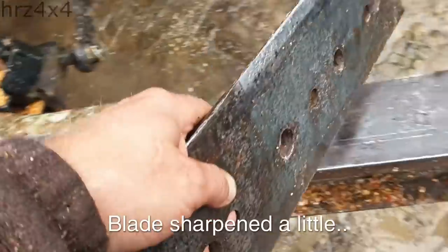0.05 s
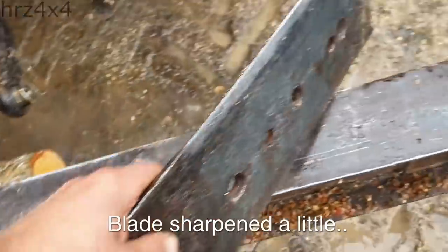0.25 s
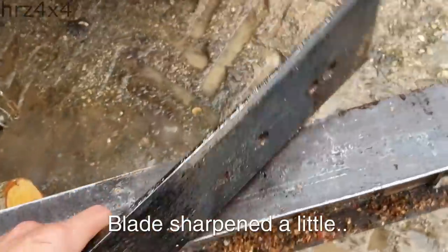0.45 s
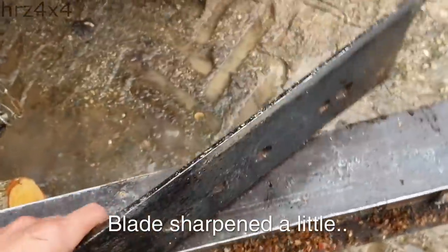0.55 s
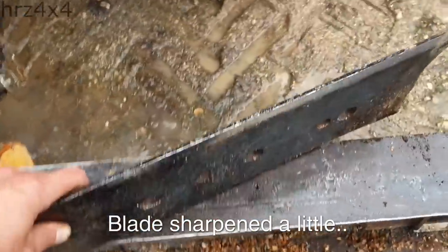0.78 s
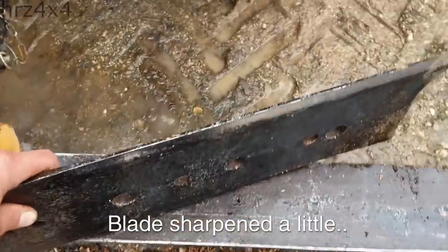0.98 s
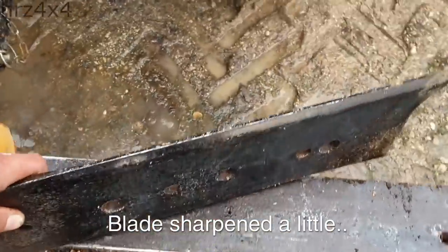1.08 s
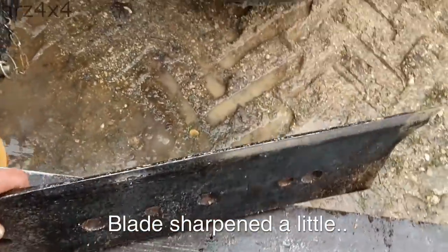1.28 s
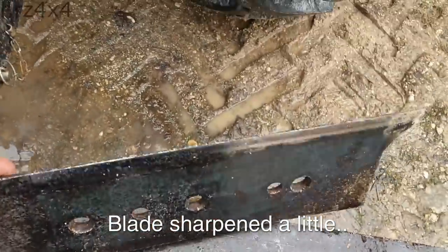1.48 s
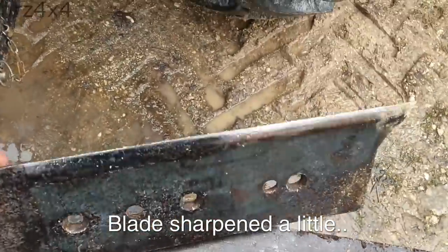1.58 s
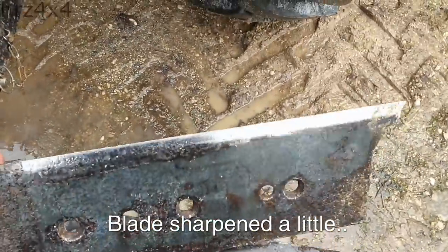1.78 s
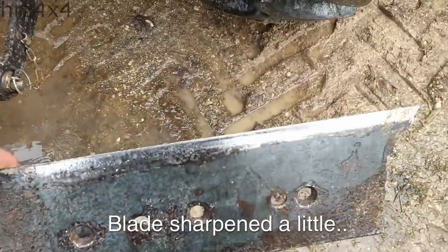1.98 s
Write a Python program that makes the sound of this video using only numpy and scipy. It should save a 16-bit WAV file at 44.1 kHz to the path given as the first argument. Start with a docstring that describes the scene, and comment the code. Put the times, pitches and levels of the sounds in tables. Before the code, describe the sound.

A steel blade clanks and rings against a steel beam, then wind buffets the microphone.

```python
"""Steel blade clanking on a beam

A heavy steel blade is laid over on a steel beam outdoors. It lands, bounces and chatters in two
bouts of clanks. Each knock makes blade and beam ring together, until the hand damps them. Then
the blade is tilted with a few light ticks while gusts buffet the microphone, over a faint hiss."""
import sys
import numpy as np
from scipy import signal
from scipy.fft import irfft
from scipy.io import wavfile

SR = 44100
rng = np.random.default_rng(int(sys.argv[2]) if len(sys.argv) > 2 else 0)


def wrap_up_sound(samples):
    """Save the sound to the file named by the first command line argument, as 16-bit audio."""
    columns = np.atleast_2d(samples).T
    # keep every value between -1 and 1, then stretch to whole-number steps
    tamed = np.clip(columns, -1, 1)
    steps = np.round(tamed * 32767).astype(np.int16)
    wavfile.write(sys.argv[1], SR, steps)


N = 90404
TIME = np.arange(N) / SR
RING_SIZE = SR // 2
RING_TIME = TIME[:RING_SIZE]
EDGES_HZ = np.geomspace(20, 17000, 35)
BANDS_HZ = np.sqrt(EDGES_HZ[1:] * EDGES_HZ[:-1])

# Levels in the tables are relative. A fade time (T60) is how long a sound takes to drop by 60 dB.
# Where the strength of a knock is given: (frequency [Hz])
KNOCK_HZ = [220, 520, 1500, 4000, 11000]
# Steel meets steel: (time [s], chatter length [s], then a level [dB] for each of KNOCK_HZ)
KNOCKS = [ (0.1999, 0.0028, -25, -17.5, -23.5, -23, -39.5), (0.2135, 0.0061, -37, -18.5, -31, -33.5, -38),
          (0.2406, 0.0049, -42, -26, -34.5, -23, -28), (0.3066, 0.0047, -38.5, -39, -42, -31.5, -34),
          (0.377, 0.015, -45.5, -35, -39.5, -32, -36.5), (0.4003, 0.00058, -41, -35, -33.5, -28.5, -31),
          (0.6081, 0.014, -54, -51, -33.5, -32.5, -31.5), (0.6208, 0.0086, -27, -21.5, -25, -26, -27.5),
          (0.6524, 0.0052, -25.5, -39, -27.5, -36.5, -34.5), (0.658, 0.0042, -38.5, -25, -30, -16, -24),
          (0.6790, 0.042, -33, -28.5, -28.5, -34, -34.5), (0.732, 0.0018, -31, -57, -37, -31.5, -34.5),
          (0.7818, 0.0031, -41.5, -44.5, -48.5, -35, -37.5), (0.805, 0.013, -69.5, -42, -53, -43.5, -42),
          (0.841, 0.0013, -43.5, -40, -47, -56, -66), (1.0749, 0.001, -72, -62, -72, -69, -63),
          (1.229, 0.00093, -70, -77, -73, -65.5, -67.5), (1.3991, 0.0087, -62, -44.5, -52.5, -58, -56),
          (1.626, 0.0072, -66, -74, -77, -54.5, -51), (1.6728, 0.0036, -81.5, -72, -54.5, -48, -43)]
CHATTER_PER_S, CHATTER_SIZE = 1500, .5
# Modes, the tones at which blade and beam naturally ring: (pitch [Hz])
MODE_HZ = [174, 238, 272, 414, 437, 597, 657, 790, 853, 914, 964, 1255, 1418, 1577, 1640, 1700, 1782, 2015,
           2675, 3053, 3166, 3495, 3793, 3848, 3936, 4477, 4590, 8270, 9835, 11142]
# For each of those modes: (level with blade on edge [dB], level with blade flat [dB], fade time [s])
MODES = [(-30, -16, 0.66), (-8, -8, 0.28), (-16, -15.5, 0.42), (-5, -11, 0.25), (-6, -21, 0.34),
         (-3, -9, 0.083), (-18, -8, 0.19), (-15.5, -19, 0.43), (-20.5, -30.5, 0.18), (-8, -36.5, 0.2),
         (-13.5, -14.5, 0.46), (-2.5, -19, 0.096), (-17.5, -19.5, 0.17), (-15.5, -29, 0.21),
         (-19, -20.5, 0.097), (-5.5, -5, 0.173), (-7.5, -12.5, 0.22), (-7, -8, 0.28), (-12.5, -20, 0.16),
         (-20, -10, 0.23), (-10.5, -11, 0.1), (-20, -19, .26), (-9.5, -8, 0.17), (-8, -16, 0.2),
         (-20, -12, 0.12), (-19, -36.5, 0.21), (-17, -21, .1), (-15, -7.5, 0.0417), (-33, -6.5, 0.027),
         (-24, -19, .13)]
LAID_FLAT_S, RISE_CYCLES = .55, 1
GRIPS_S, GRIP_DB_PER_S = [0.51, 0.834], 172.5  # the hand tightens
# The crowd of weaker modes in between: (frequency [Hz], level [dB], fade time [s])
CROWD = [(89.3, -8.5, 0.34), (153, -15.5, 0.4), (241.4, -4.5, 0.32), (510, -7, 0.29), (660, -3, 0.2),
         (1010, -10, 0.42), (1944, -4, 0.21), (2860, -16.5, 0.19), (3820, -6, 0.16), (4650, -15, 0.13),
         (7800, -25, 0.23), (8540, -17, 0.14), (13100, -15, 0.12), (15800, -22.5, 0.21)]
CROWD_DB, CROWD_GAP_HZ, CROWD_SPREAD_DB = -28.5, 14, 3.2  # the gap holds at 1 kHz and widens above
CLACK_DB, CLACK_T60_S = 1, 0.01
# How wide the steel sounds: (frequency [Hz], side minus mid [dB])
STEEL_WIDTH = [(100, -14), (200, -29), (380, -7.5), (700, -5.5), (1290, 2), (2400, 0.5), (15000, -1.5)]
# Which way it leans: (frequency [Hz], left minus right [dB])
STEEL_PAN = [(200, 0), (700, -.5), (1300, 0.5), (2400, -3), (4400, -3.5), (9000, -0.5)]
TICK_DB, TICK_T60_S, TICK_HZ = 12.5, 0.0045, 7000
# The blade's weight lands: (time [s], level [dB], pitch [Hz])
THUDS = [(0.2011, 0.5, 486), (.2118, 0, 609)]
THUD_T60_S, THUD_RISE_S, THUD_SKEW_RAD = 0.023, 0.0022, 0.26  # skew puts left and right out of step
# Light touches of the tilted blade: (time [s], level [dB])
PINGS = [(1.399, -53.5), (1.623, -55), (1.674, -49)]
PING_HZ, PING_T60_S = 4224, .25
# The blade slides as it tilts: (time [s], level [dB])
SLIDE_LEVEL = [(1.385, -99), (1.40, -66.5), (1.46, -62.5), (1.54, -67.5), (1.59, -65), (1.65, -60),
               (1.72, -66.5), (1.8, -67), (1.92, -68.5), (2.05, -81)]
# The tone of that rub: (frequency [Hz], level [dB])
SLIDE_SPECTRUM = [(1000, -30), (2500, -12.5), (4200, 7), (6500, -1.5), (9000, 2.5), (11500, 3), (16000, -8)]
GRIT_DB, GRIT_HZ = 2.5, 110

# Wind on the microphone: (time [s], rumble [dB], flutter [dB], left minus right [dB])
GUSTS = [(0, -67, -69, -28), (.13, -49.5, -66, -1), (.27, -60, -77, -18), (.55, -78, -79.5, -4),
         (1.02, -54, -67.5, -0.5), (1.08, -42, -58.5, -7.5), (1.17, -56.5, -68, 2), (1.24, -39, -58, 0),
         (1.37, -31, -39, -2), (1.405, -32, -23.5, 1.5), (1.44, -33, -36.5, -2), (1.545, -34, -48, -1),
         (1.575, -32, -38.5, -2.5), (1.63, -31.5, -33, -4.5), (1.69, -33, -51.5, -1.5),
         (1.76, -36.5, -40.5, -2), (1.785, -37, -38.5, 0.5), (1.89, -35, -44, -2),
         (1.955, -45, -51.5, -2.5), (2.02, -29, -44, -3), (2.05, -45, -54, -6.5)]
# The wind's deep rumble: (frequency [Hz], level [dB])
RUMBLE_SPECTRUM = [(20, -25.5), (45, 5.5), (90, -0.5), (150, -6), (250, -22), (500, -42.5), (1000, -76)]
# Its higher flutter: (frequency [Hz], level [dB])
FLUTTER_SPECTRUM = [(60, -6), (150, -5.5), (280, 2), (450, -5), (700, -17.5), (1300, -27), (2500, -52),
                    (6000, -65), (16000, -78)]
RUMBLE_DB, FLUTTER_DB, LUMPS_DB, LUMPS_HZ = -0.5, 3, 2.5, 45
# Eddies, single swirls of air: (time [s], level [dB], pitch [Hz], left minus right [dB])
EDDIES = [(1.081, -36, 71, -2), (1.395, -19, 234, 5), (1.419, -14, 250, -8), (1.45, -25, 98, -13),
          (1.576, -16.5, 94.6, -1.5), (1.624, -29, 300, -4), (1.806, -23, 110, -20),
          (1.847, -20.5, 79.4, -14), (1.886, -20, 103, 2)]
EDDY_HALF_CYCLES, EDDY_SKEW_RAD = 0.76, 0.71
# The tone of the outdoor hiss: (frequency [Hz], level [dB])
AIR_SPECTRUM = [(30, -7.5), (250, -4), (450, 2.5), (800, 1), (1300, -5.5), (1750, -3.5), (2100, -1),
                (2500, -14), (3100, -12), (6000, -24), (11000, -22), (16000, -29.5)]
# How loud that hiss is: (time [s], level [dB])
AIR_LEVEL = [(0, -51.5), (.17, -49), (.55, -57), (.9, -54.5), (1.15, -57.5), (1.7, -59.5), (2.05, -60)]
LOW_CUT_HZ, HIGH_CUT_HZ = 34, 15900


def clear_modes():
    """Each knock adds energy to every mode of the steel; once the blade lies flat, other modes lead."""
    hz = np.array(MODE_HZ)
    edge_db, flat_db, t60 = np.transpose(MODES)
    skew = np.arctan(from_db(at_hz(STEEL_WIDTH, hz)[0]))
    stereo = panned(at_hz(STEEL_PAN, hz)[0]) * np.exp(1j * np.array([-skew, skew]))
    rings = np.sqrt(2) * np.exp(2j * np.pi * np.outer(hz, RING_TIME)) * dying(t60) * rising(hz)
    out, last_s = np.zeros((2, N + SR)), 0
    swing = 1e-12 * np.exp(2j * np.pi * rng.random(len(hz)))
    for s, _, *knock_db in KNOCKS:
        swing = swing * np.exp((2j * np.pi * hz - np.log(1000) / t60) * (s - last_s))
        size = knock_strength(hz, knock_db) * from_db(edge_db if s < LAID_FLAT_S else flat_db)
        # A kick a quarter cycle off the swing already there never cancels it.
        kick = size * rng.choice([-1j, 1j], len(hz)) * np.exp(1j * np.angle(swing))
        add_ring(out, s, ((stereo * kick) @ rings).real)
        swing, last_s = swing + kick, s
    return out[:, :N]


def crowded_modes():
    """Modes too close to tell apart clack and ring, in a new mixture for each point of contact."""
    db, t60 = at_hz(CROWD, BANDS_HZ)
    mid, side = split_bands(crowd_tones(size=2 * SR)).transpose(1, 0, 2)
    width = from_db(at_hz(STEEL_WIDTH, BANDS_HZ)[0])[:, None]
    tones = np.array([mid + width * side, mid - width * side]) / np.sqrt(1 + width ** 2)
    envelope = (dying(t60) + from_db(CLACK_DB) * dying(CLACK_T60_S)) * rising(BANDS_HZ)
    stereo = np.sqrt(SR / 2) * from_db(db + CROWD_DB) * panned(at_hz(STEEL_PAN, BANDS_HZ)[0])
    out = np.zeros((2, N + SR))
    for s, chatter_s, *knock_db in KNOCKS:
        start = rng.integers(SR)
        gains = stereo * knock_strength(BANDS_HZ, knock_db)
        ring = np.einsum("cb,cbt,bt->ct", gains, tones[:, :, start:start + RING_SIZE], envelope)
        clank = signal.fftconvolve(ring, chatter(chatter_s)[None], axes=1)
        add_ring(out, s, clank[:, :RING_SIZE])
    return out[:, :N]


def crowd_tones(size):
    """Hundreds of steady tones, unevenly spaced and unequal in strength."""
    step = CROWD_GAP_HZ / (2 * np.sqrt(1000))
    roots = np.arange(np.sqrt(EDGES_HZ[0]), np.sqrt(EDGES_HZ[-1]), step)
    hz = (roots + step * rng.random(len(roots))) ** 2
    strength = np.sqrt(roots) * from_db(CROWD_SPREAD_DB * rng.standard_normal(len(hz)))
    lines = np.zeros((2, 2, size // 2 + 1), complex)
    lines[..., (hz * size / SR).astype(int)] = strength * np.exp(2j * np.pi * rng.random((2, 2, len(hz))))
    return rms_one(irfft(lines, size))


def chatter(length_s):
    """The force of one knock: a blow, then tiny bounces that die away."""
    t = TIME[:SR // 10]
    sizes = CHATTER_SIZE * rng.standard_normal(len(t))
    touching = rng.random(len(t)) < CHATTER_PER_S / SR
    force = sizes * touching * np.exp(-t / length_s)
    force[0] = 1
    return force / np.linalg.norm(force)


def knock_strength(hz, knock_db):
    """How strongly one knock drives each frequency."""
    return from_db(np.interp(np.log(hz), np.log(KNOCK_HZ), knock_db))


def rising(hz):
    """A ring builds up briefly as it spreads through the steel."""
    return 1 - np.exp(-np.outer(hz, RING_TIME) / RISE_CYCLES)


def add_ring(out, s, ring):
    """Start a ring at s seconds; the hand's next grip, if there is one, chokes it."""
    grip_s = min([g for g in GRIPS_S if g > s], default=np.inf)
    held_s = np.maximum(s + RING_TIME - grip_s, 0)
    start = int(s * SR)
    out[:, start:start + RING_SIZE] += ring * from_db(-GRIP_DB_PER_S * held_s)


def ticks():
    """Edge meets edge with a brief bright tick; the longer the chatter, the weaker it is."""
    out = np.zeros((2, N + SR))
    bright = signal.butter(2, TICK_HZ, "high", fs=SR, output="sos")
    for s, chatter_s, *knock_db in KNOCKS:
        burst = rng.standard_normal((2, RING_SIZE)) * dying(TICK_T60_S)
        gain = from_db(TICK_DB + knock_db[-1]) / (1 + (chatter_s / TICK_T60_S) ** 2)
        add_ring(out, s, gain * signal.sosfilt(bright, burst + 1e-18))
    return out[:, :N]


def thuds():
    """The first landing shoves the beam into a few low swings that die quickly."""
    out, skew = np.zeros((2, N)), THUD_SKEW_RAD * np.array([[-1], [1]])
    for s, db, hz in THUDS:
        t = np.maximum(TIME - s, 0)
        envelope = from_db(db - 60 * t / THUD_T60_S) * (1 - np.exp(-t / THUD_RISE_S))
        out += envelope * np.sin(2 * np.pi * hz * t + skew)
    return out


def pings():
    """Each light touch sets one high mode of the blade singing."""
    out = np.zeros((2, N + SR))
    for s, db in PINGS:
        tone = np.sin(2 * np.pi * (PING_HZ * RING_TIME + rng.random((2, 1))))
        add_ring(out, s, from_db(db) * dying(PING_T60_S) * tone)
    return out[:, :N]


def slide():
    """Steel rubs on steel with a faint, gritty hiss."""
    rub = from_db(in_time(SLIDE_LEVEL)[0]) * shaped_noise(SLIDE_SPECTRUM)
    grit = rms_one(from_db(GRIT_DB * drift(GRIT_HZ)[0]))
    return rub * grit


def wind():
    """Churning air rumbles on the microphone; strong gusts add a higher, lumpy flutter."""
    rumble_db, flutter_db, pan_db = in_time(GUSTS)
    lumps = rms_one(from_db(LUMPS_DB * drift(LUMPS_HZ)))
    rumble = from_db(rumble_db + RUMBLE_DB) * shaped_noise(RUMBLE_SPECTRUM)
    flutter = from_db(flutter_db + FLUTTER_DB) * shaped_noise(FLUTTER_SPECTRUM) * lumps
    return (rumble + flutter) * panned(pan_db)


def eddies():
    """Each eddy hits the microphone as a soft swell of one or two pressure swings."""
    out = np.zeros((2, N))
    for s, db, hz, pan_db in EDDIES:
        cycles = (TIME - s) * hz
        phase = 2 * np.pi * rng.random() + EDDY_SKEW_RAD * rng.choice([-1, 1]) * np.array([[1], [-1]])
        swell = from_db(db) * np.exp(-(cycles / EDDY_HALF_CYCLES) ** 2)
        out += panned(pan_db)[:, None] * swell * np.cos(2 * np.pi * cycles + phase)
    return out


def air():
    """A faint, smooth outdoor hiss."""
    return from_db(in_time(AIR_LEVEL)[0]) * shaped_noise(AIR_SPECTRUM)


def shaped_noise(spectrum):
    """Stereo noise with the given balance of lows and highs."""
    bands = split_bands(rng.standard_normal((2, 2, N + SR // 10)))
    gains = from_db(at_hz(spectrum, BANDS_HZ)[0])
    return rms_one(np.tensordot(gains, bands, 1))


def split_bands(pairs):
    """Deal two pairs of signals in turn to the frequency bands: bands x 2 x samples."""
    filters = [signal.butter(2, EDGES_HZ[k:k + 2], "band", fs=SR, output="sos")
               for k in range(len(BANDS_HZ))]
    return np.array([signal.sosfilt(band, pairs[k % 2])[:, SR // 10:] for k, band in enumerate(filters)])


def drift(hz):
    """A random wander in each channel, mostly slower than hz."""
    smooth = signal.butter(2, hz, fs=SR, output="sos")
    return rms_one(signal.sosfilt(smooth, rng.standard_normal((2, N + SR)))[:, SR:])


def dying(t60):
    """One fading curve for each fade time."""
    return from_db(-60 * RING_TIME / np.reshape(t60, (-1, 1)))


def panned(db):
    """Left and right gains that keep the total power the same."""
    gains = from_db(np.array([db, -db]) / 2)
    return gains / np.sqrt(np.mean(gains ** 2, axis=0))


def in_time(rows):
    """Join a table's rows with straight lines through time."""
    s, *columns = np.transpose(rows)
    return [np.interp(TIME, s, c) for c in columns]


def at_hz(rows, hz):
    """Read a table's columns at the given frequencies."""
    row_hz, *columns = np.transpose(rows)
    return [np.interp(np.log(hz), np.log(row_hz), c) for c in columns]


def from_db(db):
    """Turn decibels into a gain."""
    return 10 ** (np.asarray(db) / 20)


def rms_one(x):
    """Scale a signal so its typical size (rms) is 1."""
    return x / np.sqrt(np.mean(x ** 2) + 1e-20)


def scene():
    """Steel, wind and background together."""
    steel = clear_modes() + crowded_modes() + ticks() + thuds() + pings() + slide()
    return steel + wind() + eddies() + air()


def record(dry):
    """Trim the deepest rumble and cut off the highest treble."""
    trimmed = signal.sosfilt(signal.butter(2, LOW_CUT_HZ, "high", fs=SR, output="sos"), dry)
    return signal.sosfilt(signal.ellip(10, .2, 80, HIGH_CUT_HZ, fs=SR, output="sos"), trimmed)


dry = scene()
out = record(dry)
wrap_up_sound(out)
```